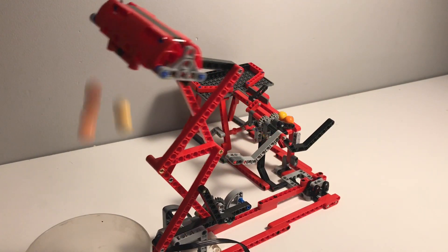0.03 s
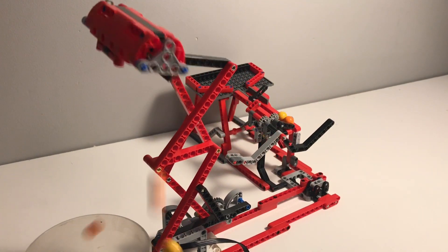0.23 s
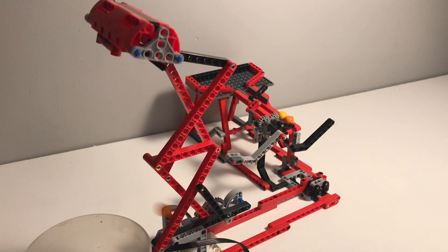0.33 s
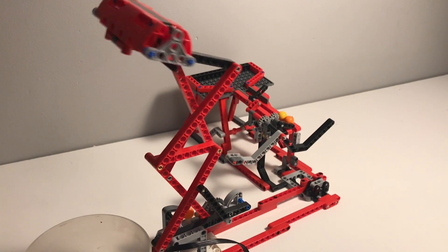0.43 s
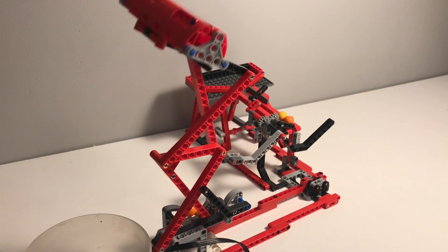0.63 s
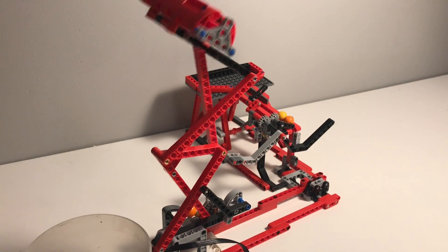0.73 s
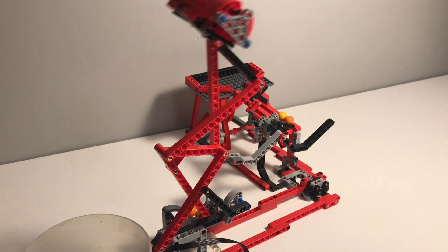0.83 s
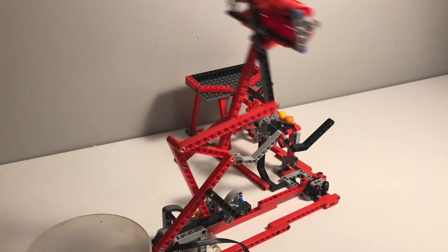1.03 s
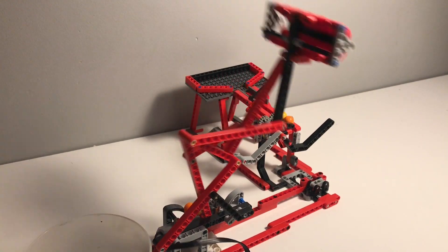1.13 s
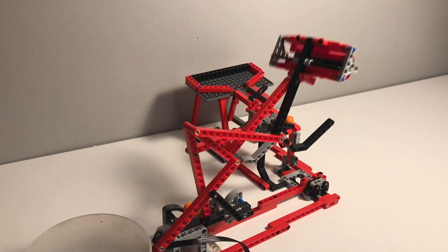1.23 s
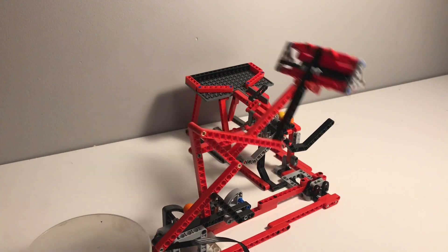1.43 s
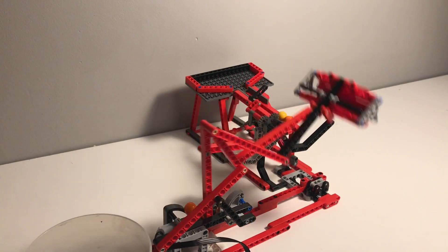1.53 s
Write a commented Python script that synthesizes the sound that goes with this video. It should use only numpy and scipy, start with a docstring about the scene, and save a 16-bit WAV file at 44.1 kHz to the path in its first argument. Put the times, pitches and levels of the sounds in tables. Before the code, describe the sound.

Small hard balls tumble from a plastic toy machine, clatter against its frame and a bowl, then clack on a table. The last bounces ever faster and settles, in a small, slightly ringing room with faint hiss.

```python
"""Toy balls dropping on a table

One microphone in a small bare room, with a faint hiss and hum. Small hard balls fall from the raised
bucket of a plastic toy machine, clatter against its frame and a bowl, then clack on the table among a
few dull bumps; the last ball bounces ever faster until it settles. A wall just behind the table throws
each clack back, the room rings after it, and the recorder's gain control ducks on the loud hits."""
import sys
import numpy as np
from scipy import signal
from scipy.fft import rfft, irfft, next_fast_len
from scipy.io import wavfile
from scipy.ndimage import uniform_filter1d

SR = 44100
rng = np.random.default_rng(int(sys.argv[2]) if len(sys.argv) > 2 else 0)


def file_out(sig):
    """Save sig as 16-bit WAV at sys.argv[1]."""
    # one column per channel
    cols = np.atleast_2d(sig).T
    # limit, then scale
    lim = np.clip(cols, -1, 1)
    pcm = np.round(lim * 32767).astype(np.int16)
    wavfile.write(sys.argv[1], SR, pcm)


N = 70560

# Tone of the hiss, the room's answer to plastic and to table, and the two contact sounds.
# Each row: frequency in Hz, relative level in dB.
HISS_SPECTRUM = [(20, -76), (50, -5.5), (85, -13), (125, -1), (170, -9.5), (300, -8), (430, -17.5),
                 (550, -10.5), (800, -16), (2500, -9.5), (3400, -13), (4700, -11), (6300, -7),
                 (7600, -13.5), (9000, -7), (10600, -15), (12300, 0.5), (13500, -9), (16000, -10.5)]
PLASTIC_ROOM_SPECTRUM = [(100, -33), (400, -11), (1200, -2.5), (2000, -30), (2800, -22), (3400, 4),
                         (4300, -0.5), (5300, -11), (8000, -11), (10500, -15.5), (16000, -22)]
TABLE_ROOM_SPECTRUM = [(60, -35), (150, -27), (280, -9), (500, 0.5), (800, 0.5), (1500, 1), (2300, 0.5),
                       (3000, -1), (3900, 1), (5200, -7.5), (6800, -5.5), (8500, -19), (10500, -24),
                       (13000, -20), (16000, -27)]
SNAP_SPECTRUM = [(200, -50), (1000, -3.5), (2500, 0.5), (4500, 1.5), (5800, -2.5), (8000, 1), (10500, -8),
                 (13000, -5.5), (15500, -6), (17500, -28)]
CRACK_SPECTRUM = [(100, -9.5), (250, -18), (500, -5), (800, 6.5), (1500, 5.5), (2300, -7.5), (4300, 10),
                  (5300, 2), (6800, 6), (8200, -2), (10200, -11.5), (13000, -7.5), (16000, -37)]
# Reverberation of the room. Each row: frequency in Hz, time to fall 60 dB (t60) in seconds.
ROOM_DECAY = [(150, 0.36), (500, 0.4), (1400, 0.37), (3600, 0.34), (7000, 0.31), (14000, 0.26)]
# Resonances of the frame and bowl, of the shaken table, and of ball and table top together.
# Each row: frequency in Hz, relative level in dB, t60 in seconds.
FRAME_BOWL_MODES = [(1098, -25, 0.38), (1200, -22, 0.069), (1327, -16, 0.063), (2202, -21.5, 0.068),
                    (3300, -25, 0.14), (3257, -30, 0.48), (3410, -23, 0.14), (3510, -33, 0.28),
                    (3800, -22, 0.053), (3584, -20, 0.12), (3822, -26, 0.26), (4600, -21, 0.092)]
TABLE_LOW_MODES = [(59.4, -24, 0.075), (129.6, -4.5, 0.11), (215, -3, 0.14), (280, -4, .2)]
CLACK_MODES = [(370, -25.5, 0.032), (742, -17.5, 0.02), (1072, -23, 0.038), (1560, -12.5, 0.0079),
               (2086, -10, 0.036), (2340, -8, .018), (2760, -6.5, 0.0065), (3400, -11, 0.013),
               (3800, -14, 0.013), (4300, -21, 0.016), (6600, -11, 0.0065)]
# Dull, hollow bumps. Each row: start in seconds, level in dB, pitch in Hz.
HOLLOW_BUMPS = [(0.2494, 11, 1350), (0.2550, 8, 451), (0.3200, -5, 215), (0.5395, 4.5, 743),
                (0.5600, -15, 900), (0.6030, -7.5, 369), (0.9465, 3, 704), (0.9975, 2.5, 593)]
# A ball hits the plastic. Each row: start in seconds, ring, snap and chirp levels in dB, chirp in Hz.
PLASTIC_HITS = [(0.099, -32, -16, -28, 5030), (0.2113, -32, -43, -32, 3520), (0.2495, -9, 0.5, -3, 3400),
                (0.2603, -21, -18, -5, 4100), (0.2670, 3, 0.5, -1.5, 3390), (0.2736, -26, -3, -23, 3400),
                (0.2808, -12, 2, -8, 4240), (0.2963, -10.5, -1, 0, 3400), (0.3158, -3.5, 4.5, 1, 3370),
                (0.4973, -6, -2.5, -2.5, 3420), (0.5624, -17, -7, -27, 3500), (0.5885, -19, -16, -20, 3530),
                (0.6016, -28, -9.5, -27, 3570), (0.6606, -15.5, -10, -15, 3570), (0.7388, -8, -3, -6, 3800),
                (0.8376, -12.5, -7, -6, 4410), (0.922, -9, -10, -12.5, 3560),
                (0.9831, -19, -14, -14.5, 3500), (1.0255, -20, -16, -16, 3650),
                (1.0550, -20, -12.5, -32, 3600)]
# The hardest landings shake the table. Each row: start in seconds, level in dB.
HARD_LANDINGS = [(0.2498, -22), (0.2807, -25.5), (0.4574, -40), (0.511, -33), (0.7049, -36.5)]
# A ball hits the table. Each row: start in seconds, level in dB, crack boost in dB,
# treble tilt in dB per octave.
TABLE_HITS = [(0.2493, -3.5, 12, -3), (0.2802, -5, 5, -2.5), (0.4558, -0.5, 9.5, 1),
              (0.5125, -4.5, 8.5, 2.5), (0.7066, -5.5, 5.5, 0), (0.7382, -1, 2, 3.5),
              (0.8389, -11.5, 7.5, .5), (0.9294, -6, 4, 1), (0.9907, -13.5, 7, -9), (1.0706, -8.5, 0, 0.5),
              (1.1710, -9.5, -6.5, 1), (1.2442, -11.5, -5.5, -3), (1.3008, -13.5, -5.5, -5),
              (1.3459, -15.5, -6.5, -2.5), (1.3790, -19, -5.5, -2), (1.4055, -18.5, -11, -2.5)]

HISS_DB, HUM_HZ, HUM_DB = -38.5, 117, -60.5
WALL_ECHO_S, WALL_DB = 0.00265, -3
THRESHOLD_DB, SQUEEZE, RECOVER_DB_PER_S = -21.5, 0.29, 10  # SQUEEZE: share of the excess taken off


def amp(db):
    """Decibels to gain."""
    return 10 ** (np.asarray(db) / 20)


def along(points, hz):
    """Read a curve of (Hz, value) points on a log frequency axis."""
    freqs, values = np.transpose(points)
    return np.interp(np.log(hz + 1), np.log(freqs + 1), values)


T = np.arange(SR * 2 // 5) / SR  # seconds since a contact


def fade(t60):
    """Exponential decay by 60 dB in t60 seconds."""
    return np.exp(-np.log(1000) * T / t60)


def unit(x):
    """Scale to energy 1."""
    return x / np.linalg.norm(x)


def colour(x, db_of):
    """Minimum-phase filter with the gain db_of(Hz): nothing sounds ahead of a hit."""
    size = 2 * next_fast_len(len(x))
    cepstrum = irfft(np.log(amp(db_of(np.fft.rfftfreq(size, 1 / SR)))), size)
    cepstrum[1:size // 2] *= 2
    cepstrum[size // 2 + 1:] = 0
    return irfft(rfft(x, size) * np.exp(rfft(cepstrum)), size)[:len(x)]


def tilted(x, db_per_octave, corner_hz=3000):
    """Tilt the treble above a corner."""
    return colour(x, lambda hz: db_per_octave * np.log2(1 + (hz / corner_hz) ** 4) / 4)


def shaped(x, spectrum):
    """Give a sound a spectrum and energy 1."""
    return unit(colour(x, lambda hz: along(spectrum, hz)))


def burst(spectrum, t60):
    """A dying puff of coloured noise, energy 1."""
    return shaped(rng.standard_normal(len(T)) * fade(t60), spectrum)


def add(track, start_s, sound):
    """Mix a sound in at a time."""
    part = track[round(start_s * SR):][:len(sound)]
    part += sound[:len(part)]


def background():
    """Room tone: steady hiss and a low hum."""
    hiss = colour(rng.standard_normal(N), lambda hz: along(HISS_SPECTRUM, hz))
    hum = np.sin(2 * np.pi * HUM_HZ * np.arange(N) / SR)
    return amp(HISS_DB) * hiss / hiss.std() + amp(HUM_DB) * hum


def room(spectrum, onset_s=0.0017):
    """The bare room's diffuse tail, energy 1; its treble dies first."""
    hz, t, bands = signal.stft(rng.standard_normal(len(T)), SR, nperseg=256)
    decay = amp(-60 * t / along(ROOM_DECAY, hz)[:, None])
    tail = signal.istft(bands * decay, SR, nperseg=256)[1][:len(T)]
    return shaped(tail * (1 - np.exp(-T / onset_s)), spectrum)


def bumps():
    """Dull, hollow bumps: noise that rings briefly round one pitch."""
    track = np.zeros(N)
    for start_s, db, hz in HOLLOW_BUMPS:
        band = [(hz / 4, -51), (hz, 0), (hz * 4, -51)]
        add(track, start_s, amp(db) * burst(band, t60=0.19))
    return track


def ring(modes, scatter_db):
    """A struck body's damped modes, their levels a little different on every hit."""
    sound = np.zeros(len(T))
    for k, (hz, db, t60) in enumerate(modes):
        gain = (-1) ** k * amp(db + scatter_db * rng.standard_normal())
        sound += gain * fade(t60) * np.sin(2 * np.pi * hz * T)
    return sound


def contact(spectrum, t60, click_share=0.38):
    """The click of a hard contact and the short scatter after it, sharing an energy of about 1."""
    click = shaped(1.0 * (T == 0), spectrum)
    return np.sqrt(click_share) * click + np.sqrt(1 - click_share) * burst(spectrum, t60)


def plastic_knocks(swell_s=0.0015, rough_radians=0.46):
    """Balls strike frame and bowl: a snap, a rough chirp from the plastic, and the plastic's longer ring."""
    track = np.zeros(N)
    swell = (T / swell_s) ** 3 * np.exp(3 * (1 - T / swell_s))
    for start_s, ring_db, snap_db, chirp_db, chirp_hz in PLASTIC_HITS:
        wander = uniform_filter1d(rng.standard_normal(len(T)), size=24)
        phase = 2 * np.pi * chirp_hz * T + rough_radians * wander / wander.std()
        chirp = amp(chirp_db) * swell * np.sin(phase)
        body = ring(FRAME_BOWL_MODES, scatter_db=1.5) + amp(13) * room(PLASTIC_ROOM_SPECTRUM)
        snap = contact(SNAP_SPECTRUM, t60=0.0067)
        snap = tilted(snap, db_per_octave=0.39 * snap_db)  # softer snaps are duller
        add(track, start_s, chirp + amp(ring_db) * body + amp(10 + snap_db) * snap)
    return track


def clack(db, crack_db, tilt, low_cut_hz=105):
    """One landing: a hollow tok and a crack reach the microphone directly, off the wall and the room."""
    tok = amp(-1) * ring(CLACK_MODES, scatter_db=2.5)
    crack = amp(7 + crack_db) * contact(CRACK_SPECTRUM, t60=0.0081)
    direct = tok + crack
    early_reflections = amp(10.5) * burst(TABLE_ROOM_SPECTRUM, t60=0.036)
    tail = amp(15.5) * room(TABLE_ROOM_SPECTRUM)
    sound = direct + amp(crack_db / 2) * (early_reflections + tail)
    add(sound, WALL_ECHO_S * (1 + 0.006 * rng.standard_normal()), amp(WALL_DB) * direct)
    low_cut = signal.butter(2, low_cut_hz, "high", fs=SR, output="sos")  # light balls stir little bass
    return amp(db) * tilted(signal.sosfilt(low_cut, sound), tilt)


def table_bounces(settle_s=1.4275, first_flight_s=0.0175, shrink=0.9, hop_loss_db=2):
    """Balls clack and thud on the table; the last settles in ever shorter, softer hops."""
    track = np.zeros(N)
    for start_s, db, crack_db, tilt in TABLE_HITS:
        add(track, start_s, clack(db, crack_db, tilt))
    for start_s, db in HARD_LANDINGS:
        add(track, start_s, amp(db) * ring(TABLE_LOW_MODES, scatter_db=2))
    for hop in range(7):
        start_s = settle_s + first_flight_s * np.sum(shrink ** np.arange(hop))
        add(track, start_s, clack(-22.5 - hop_loss_db * hop, crack_db=-1, tilt=-10))
    return track


def scene():
    """Everything as it arrives at the one microphone."""
    return (table_bounces() + plastic_knocks() + bumps() + background())[None]


def record(dry, top_hz=15900):
    """The recorder ducks after loud hits, rounds off the peaks and passes nothing above top_hz."""
    power = uniform_filter1d(dry[0] ** 2, size=180)
    level_db = 10 * np.log10(np.abs(power) + 1e-12)
    excess_db = np.maximum(level_db - THRESHOLD_DB, 0)
    recovery_db = RECOVER_DB_PER_S * np.arange(N) / SR
    duck_db = np.maximum.accumulate(SQUEEZE * excess_db + recovery_db) - recovery_db
    ducked = dry * amp(-duck_db)
    rounded = ducked / (1 + np.abs(ducked) ** 6) ** (1 / 6)
    size = next_fast_len(N + SR // 2)
    passband = np.fft.rfftfreq(size, 1 / SR) < top_hz
    return irfft(rfft(rounded, size) * passband, size)[:, :N]


dry = scene()
out = record(dry)
file_out(out)
```